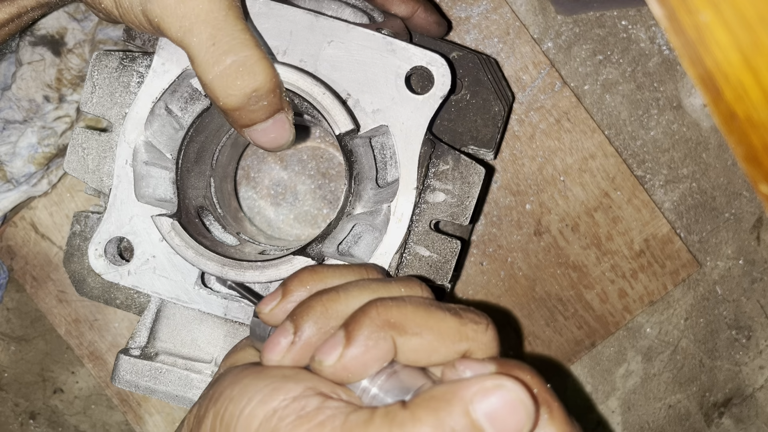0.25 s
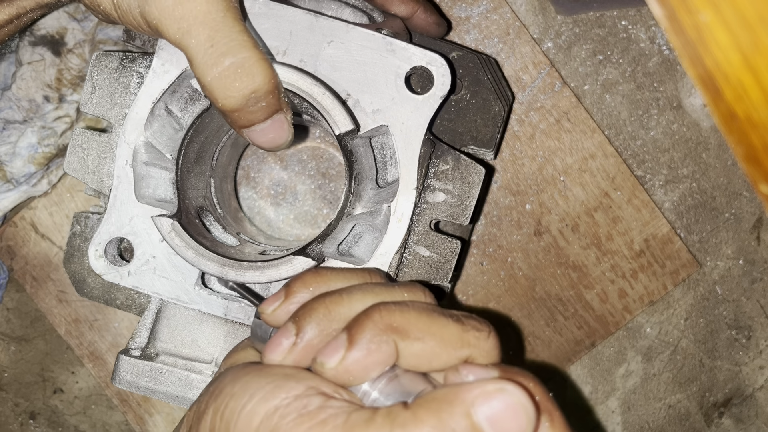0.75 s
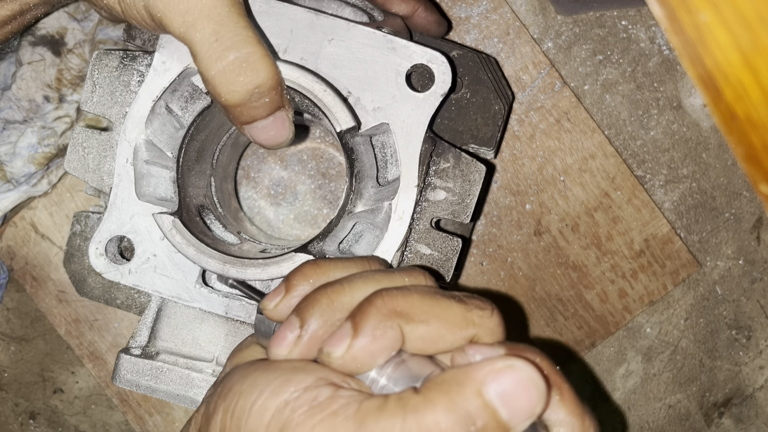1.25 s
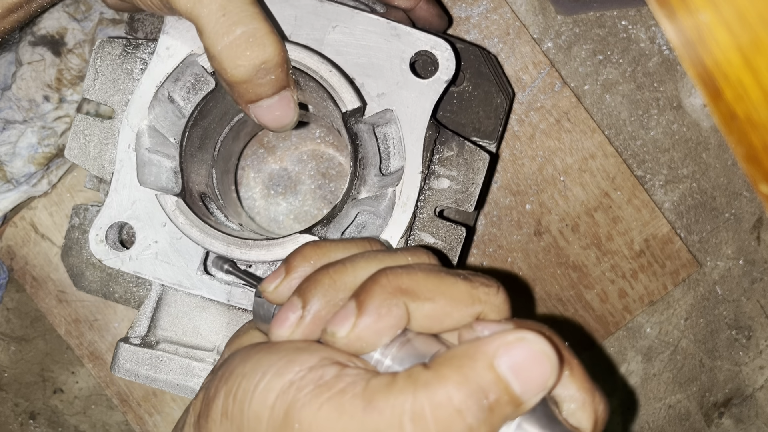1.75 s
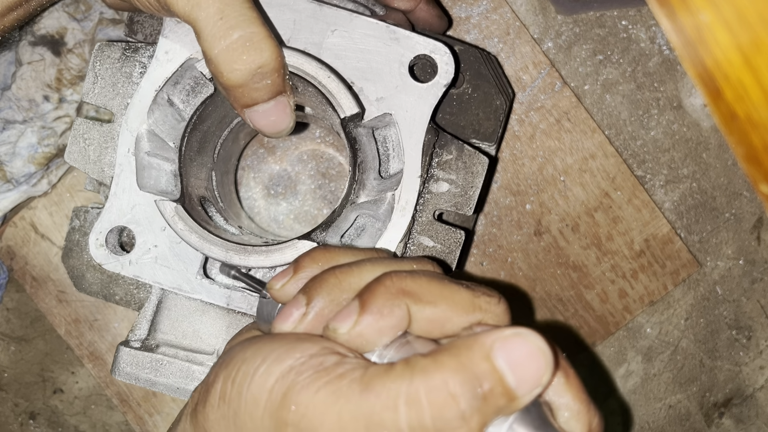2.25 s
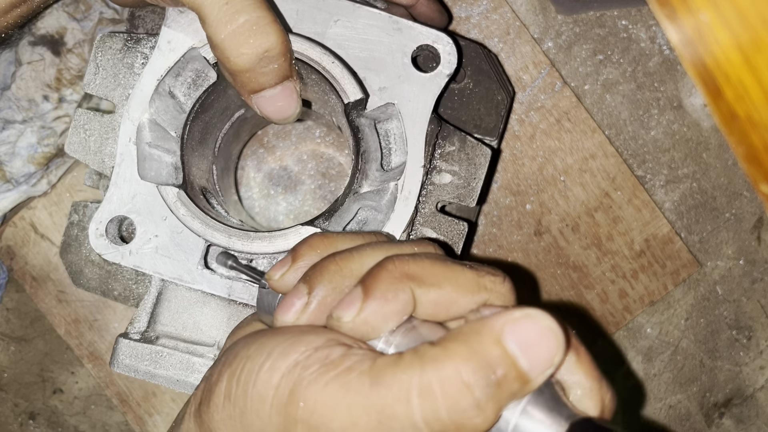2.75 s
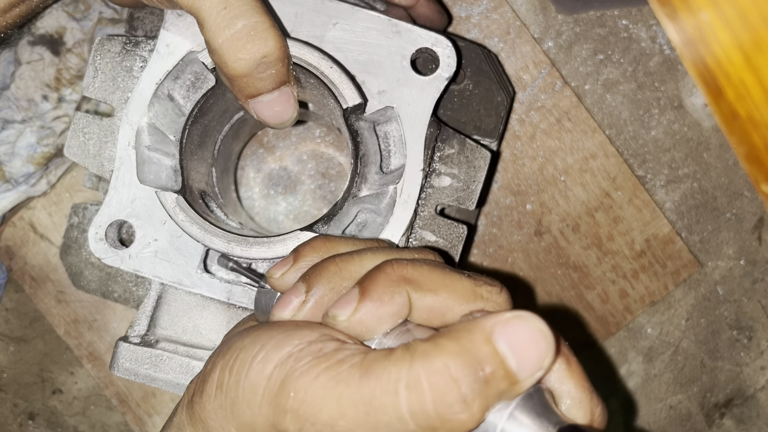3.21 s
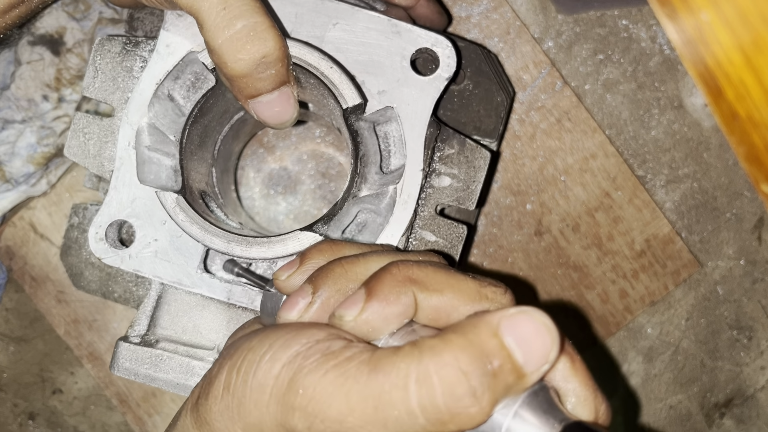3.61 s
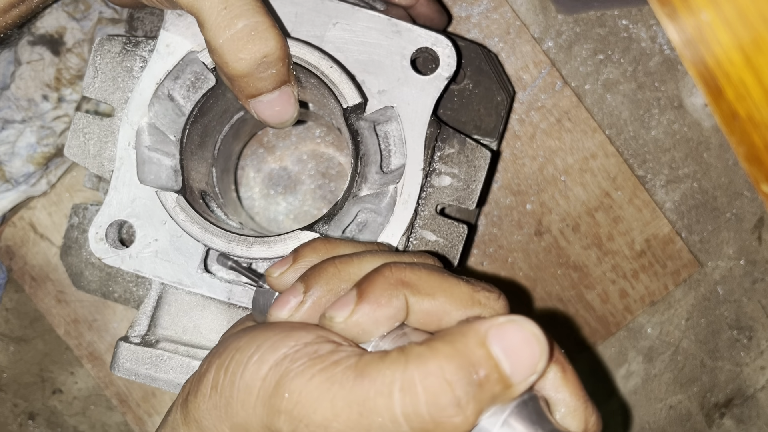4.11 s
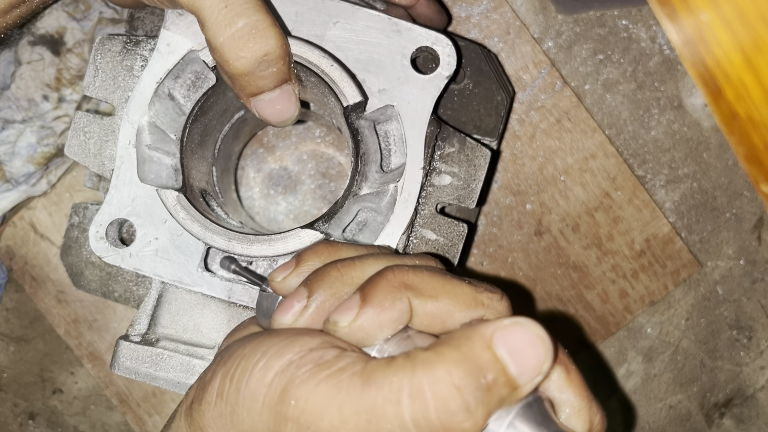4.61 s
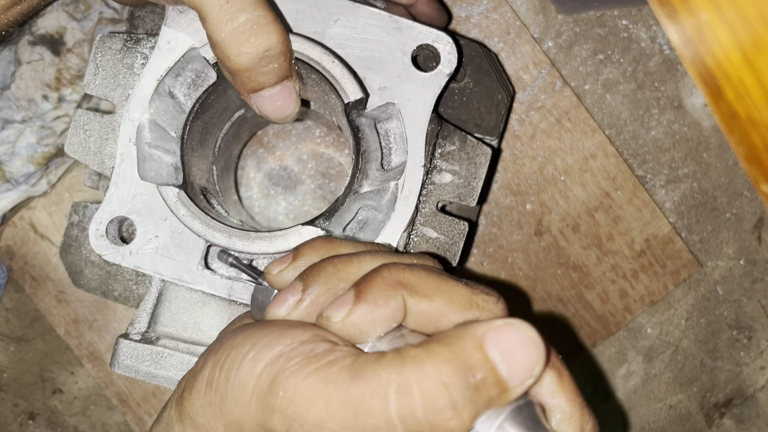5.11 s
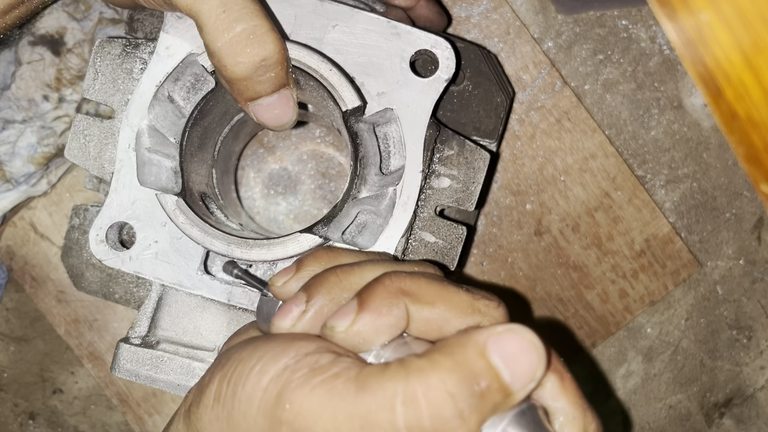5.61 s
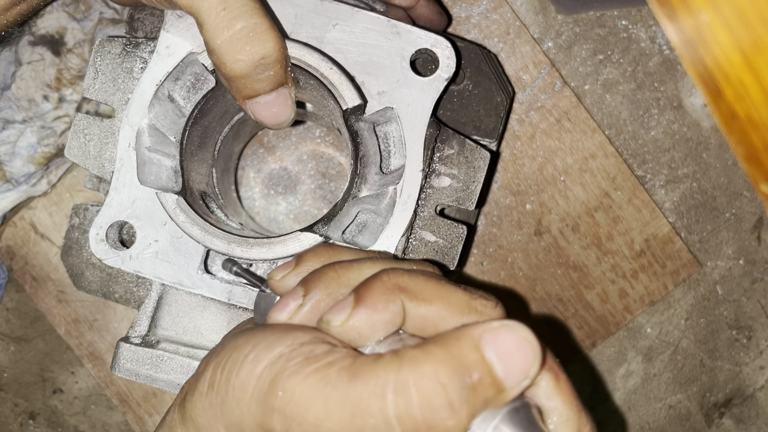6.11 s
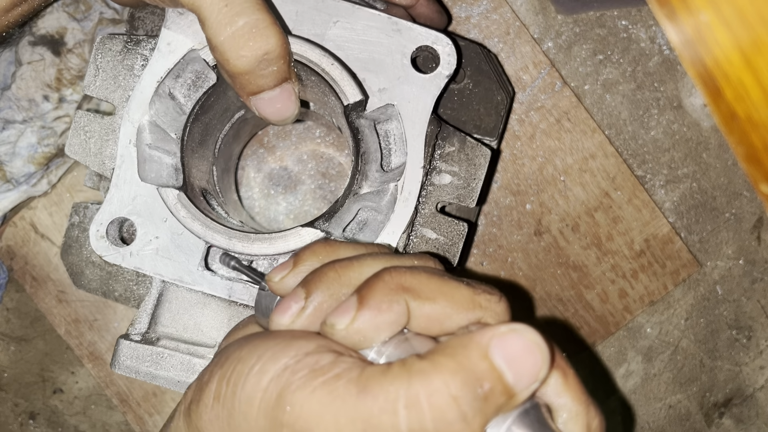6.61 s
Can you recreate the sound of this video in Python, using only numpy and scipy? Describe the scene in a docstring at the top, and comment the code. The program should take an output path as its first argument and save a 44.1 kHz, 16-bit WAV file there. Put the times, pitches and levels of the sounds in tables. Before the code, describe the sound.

A small handheld grinder carves a metal engine cylinder in short, rasping, screeching passes, whirring quietly in between.

```python
"""A die grinder's toothed burr carves a port of an aluminium engine cylinder, close up, in nine passes.
It bites at once: each flute strikes the wall and tears a chip, and the casting rings. The shaft slows,
two light touches follow, then it speeds up for longer cuts. In each the burr first skates and screeches,
then seats, fills out and sets the cylinder singing, chattering when leaned on. Between passes the drive
whirrs freely. Near 4.5 s the work bumps on the bench, and three more passes follow."""
import sys
import numpy as np
from scipy import signal
from scipy.fft import rfft, irfft, next_fast_len
from scipy.io import wavfile
from scipy.ndimage import uniform_filter1d

SR = 44100
rng = np.random.default_rng(int(sys.argv[2]) if len(sys.argv) > 2 else 0)


def put_to_file(sound):
    """Save the sound as 16-bit audio at rate SR, in the file named by the first command-line argument."""
    columns = np.atleast_2d(sound).T  # one column per channel
    safe = np.clip(columns, -1, 1)
    whole_steps = np.round(safe * 32767)
    wavfile.write(sys.argv[1], SR, whole_steps.astype(np.int16))


N = 302526
FFT_SIZE = 2 * next_fast_len(N // 2 + 8192)
TIME, FREQ = np.arange(N) / SR, np.fft.rfftfreq(FFT_SIZE, 1 / SR)

# the shaft's drifting speed: (time [s], turn rate [Hz])
SHAFT_SPEED = [(0.0, 89.3), (0.19, 90.47), (0.61, 77.25), (1.2, 56.8), (1.43, 77.4), (1.6, 85.1),
               (1.74, 98.87), (1.97, 110.6), (2.69, 123.7), (2.77, 112.5), (3.1, 110.1), (3.52, 94.05),
               (4.03, 91.45), (4.49, 82.65), (4.64, 81.24), (5.06, 119.1), (5.69, 128.4), (6.32, 99.1),
               (6.74, 97.3), (6.86, 93.7)]
# how hard the burr bites, one curve a pass: (time [s], level [dB])
BITE_CURVES = [
    [(0.0, -38), (0.242, -26), (0.386, -32.5), (0.608, -29), (0.622, -28), (0.686, -31), (0.722, -28),
     (0.79, -31.5), (0.808, -27), (1.0, -36), (1.06, -34.5), (1.1, -44)],
    [(1.242, -41.5), (1.27, -57), (1.275, -65)],
    [(1.33, -45.5), (1.38, -41), (1.44, -45.5), (1.454, -38.5), (1.462, -44), (1.492, -39.5),
     (1.554, -48.5), (1.57, -50)],
    [(1.845, -44), (1.849, -31), (2.145, -25), (2.213, -30), (2.227, -25), (2.277, -25.5), (2.301, -28),
     (2.383, -24.5), (2.391, -28.5), (2.419, -27), (2.473, -36), (2.49, -42.5)],
    [(2.877, -33), (3.059, -27.5), (3.137, -27.5), (3.143, -29), (3.473, -29), (3.481, -32), (3.533, -29.5),
     (3.563, -37), (3.601, -39), (3.609, -40.5), (3.64, -49.5)],
    [(3.77, -31), (3.788, -49), (3.794, -38.5), (3.962, -31.5), (4.128, -31), (4.218, -31.5), (4.236, -35),
     (4.296, -30.5), (4.466, -36), (4.488, -44), (4.526, -42), (4.54, -53)],
    [(4.793, -43), (4.937, -35), (4.963, -31.5), (5.097, -27), (5.117, -30), (5.151, -26.5), (5.235, -28.5),
     (5.345, -25.5), (5.443, -29.5), (5.457, -27), (5.531, -36.5), (5.57, -56)],
    [(5.711, -38), (5.717, -36.5), (5.793, -37), (5.849, -29), (5.875, -30.5), (5.891, -28.5),
     (5.949, -28.5), (5.993, -27), (6.025, -29.5), (6.313, -29.5), (6.353, -36), (6.4, -47)],
    [(6.62, -44), (6.628, -43), (6.718, -29), (6.75, -31.5), (6.86, -33)],
]
# attack and colour of each pass: (landing time [s], seating time [s], knock [dB], then trims for
# hiss [dB], screech [dB], chatter [dB], shudder [dB], bell [dB], flange [dB])
PASS_VOICING = [ (0.0068, 0.01, -6, -1.5, 0, -5, -7, 1, -0.5),
                (0.00036, 0.3, 11.5, -4, -2, -12, -5, 10, 10), (0.009, 0.3, 0, -2.5, 0, -1, -8, 6, 1.5),
                (0.00047, 0.3, 14, -1, 1.5, 1.5, -2, 3.5, -6),
                (0.0094, 0.34, 0, -0.5, 3.5, 2.5, -7.5, 3.5, -1.5),
                (0.021, 0.45, -6, 0, 1, 0, -12, 6.5, -1), (0.0004, 0.37, 6, -1, 2.5, -0.5, 0, 1, -6),
                (0.00037, 0.21, 1, -0.5, 0.5, 2, -2.5, 2.5, 1), (0.00046, 0.43, 13, 0, 1, -6, -4, 3, 0.5), ]
# the burr judders in the cut: (time [s], length [s], chatter boost [dB], shudder boost [dB])
JUDDER_SWELLS = [(0.24, 0.08, 0, 3), (0.826, 0.39, 4.5, 11), (2.246, 0.044, 2, 1), (2.36, 0.068, 3, -2.5),
                 (3.362, 0.042, 3, -1), (4.336, 0.23, 5, 6), (5.402, 0.12, 4, 3.5), (6.25, 0.07, 2.5, 8)]
# the cylinder's bell mode sings out: (time [s], length [s], boost [dB])
BELL_SWELLS = [(0.262, 0.035, 10), (0.84, 0.15, 5.5), (1.032, 0.14, 10.5), (2.328, 0.024, 8),
               (3.535, 0.078, 9.5), (4.287, 0.057, 6), (4.459, 0.036, 6.5), (5.105, 0.041, 14.5),
               (5.306, 0.14, 15.5), (6.33, 0.091, 12.5)]
# the casting's clear ring: (frequency [Hz], width [Hz], level [dB])
CASTING_MODES = [(2152, 18, 6.7), (2901, 18, -2.8), (3235, 18, 0.9), (3476, 144, 0.5), (3690, 34, 2.0),
                 (4121, 170, -1.6), (4484, 27, 10.5), (4548, 50, 2.7), (5703, 80, -1.3), (6187, 32, -2.8),
                 (6306, 18, 3.7), (6542, 22, 6.2), (7290, 58, 7.8), (7447, 63, 6.5), (7821, 21, 3.0),
                 (8029, 33, 4.6), (8850, 23, 0.4), (9270, 30, 2), (9931, 149, 1.6), (10456, 27, 2.2),
                 (11033, 170, -0.9), (13400, 250, -16), (14772, 25, -6.1), (15100, 110, -12),
                 (15595, 84, -4.8)]
# the wash of its dense, damped modes: (frequency [Hz], level [dB])
CASTING_WASH = [(600, -27.5), (1500, 2), (2000, 0.5), (2500, -2), (4300, -9), (5200, -46), (6000, -33),
                (6700, -9.5), (7400, -0.5), (8600, -13), (11400, -15), (12500, -20), (14500, -15),
                (15700, -58)]
# sharp modes of the thin port wall: (frequency [Hz], width [Hz], level [dB])
SCREECH_MODES = [(4965, 22, 0.0), (5135, 43, -8.5), (5345, 33, -6.3), (5450, 14, -9.4)]
# the wall's damped rasp beneath them: (frequency [Hz], width [Hz], level [dB])
RASP_MODES = [(4510, 73, -6), (5600, 300, -17)]
# a second sharp ring, likely the flange: (frequency [Hz], width [Hz], level [dB])
FLANGE_MODES = [(2147, 32, 0)]
# resonances that swell as the burr is leaned on: (frequency [Hz], width [Hz], level [dB])
CHATTER_MODES = [(1160, 140, -3), (1508, 93, 8.5), (1725, 50, 3), (1873, 49, 0.5)]
# the handpiece's shudder: (frequency [Hz], width [Hz], level [dB])
SHUDDER_MODES = [(854, 17, 6), (1060, 90, 0), (610, 560, -7)]
# thin rings of the lifted burr and the casting: (time [s], pitch [Hz], decay [s], level [dB])
LIFT_RINGS = [(2.47, 5520, 0.049, -41), (5.608, 2420, 0.31, -44)]
# soft bench bumps: (time [s], start pitch [Hz], end pitch [Hz], decay [s], level [dB])
BENCH_BUMPS = [(4.497, 110, 61, 0.052, -29), (4.548, 317, 55.7, 0.048, -24),
               (4.784, 185.9, 181.7, 0.075, -35.5)]
# colour of the free-running drive: (frequency [Hz], level [dB])
WHIRR_EQ = [(60, -20.5), (150, -6), (280, -7.5), (420, 0), (650, -9.5), (1000, -8), (1500, -15),
            (2000, -27.5), (3000, -37.5)]
# the whirr's own level over time: (time [s], level [dB])
WHIRR_LEVEL = [(0.0, -39), (2.03, -41.5), (2.25, -43.5), (4.81, -44.5), (4.93, -44.5), (6.86, -44.5)]
# colour of the drive's air hiss: (frequency [Hz], level [dB])
AIR_EQ = [(1000, 15), (2500, 9), (5000, 8), (7400, 6), (10000, -6), (12500, 6.5), (15500, -21.5)]
# faint tones of the drive: (pitch [multiple of shaft rate], level [dB])
SHAFT_TONES = [(2, -52), (12, -51.5), (20, -68)]
# colour of hands rumbling on the work: (frequency [Hz], level [dB])
RUMBLE_EQ = [(20, -44), (40, -14), (60, 5), (100, 0.5), (160, -11), (300, -25)]
# the rumble's own level over time: (time [s], level [dB])
RUMBLE_LEVEL = [(0.0, -54), (0.13, -51), (0.3, -45.5), (0.44, -41.5), (0.63, -48), (1.83, -42), (2.14, -47),
                (3.15, -54), (3.44, -48.5), (3.92, -53), (4.39, -49), (4.55, -52.5), (5.04, -37),
                (5.39, -47), (5.81, -42), (6.08, -54), (6.57, -55), (6.86, -49)]
# stereo spread in phase: (frequency [Hz], left lead [rad])
STEREO_PHASE = [(100, 0), (400, 1.4), (900, 1.6), (1150, 3.8), (1620, 3.9), (1720, 6.3), (2200, 6.3),
                (2700, 7.2), (4500, 7), (5500, 5.5), (7000, 4.5), (8100, 3.2), (8900, 3.05), (11200, 0.1),
                (13000, 0), (14500, -3.1)]
# stereo spread in level: (frequency [Hz], left minus right [dB])
STEREO_BALANCE = [(60, 2), (110, -2), (200, -2), (380, -2), (700, 5.5), (1290, 1), (2380, 4.5), (4400, 9.5),
                  (8120, 0.5), (15000, 0)]

FLUTES, BELL_HZ = 15, 2693
# trims on the bite: (skating [dB], seated [dB])
BODY_TRIM, SCREECH_TRIM, CHATTER_TRIM = (-2.5, 0), (3.74, -1.3), (-7, -3.3)
SHUDDER_TRIM, BELL_TRIM = (-13, -6.5), (-15, -6.5)
# chips hiss more at speed and in a deep cut; both slopes count from a typical cut
TYPICAL_SHAFT_HZ, TYPICAL_BITE_DB = 112.6, -25.5
HISS_DB_PER_HZ, HISS_DB_PER_DB = 0.0477, 0.34


def cutting(turns, speed):
    """Flute blows and tearing chips drive the casting, the burr and the handpiece."""
    body, bite, hiss, screech, chatter, bell, shudder, flange = contact_envelopes(speed)
    depth = engagement(turns, bite)
    blows = steady(flute_strikes(turns), .05) * depth
    chips = steady(tearing_chips(turns), .1) * depth
    force = through(blows + chips + flute_whine(turns) * depth, dispersion(.0003))
    return (ringing_metal(force, body, bite, hiss, screech, flange)
            + chatter_and_shudder(blows, turns, chatter, shudder)
            + squawk(turns, chatter, bite)
            + singing_cylinder(bell))


def flute_strikes(turns, wear_db=4, scatter_db=2, uneven=.3, jitter=.075):
    """One blow a flute: unequal, unevenly spaced flutes repeat every turn, and each chip differs."""
    flute = np.arange(int(turns[-1] * FLUTES))
    wear, spacing = (rng.permutation(np.linspace(-1, 1, FLUTES))[flute % FLUTES] for _ in range(2))
    late, chip = rng.standard_normal((N // 10, 2))[flute].T
    at = np.interp((flute + uneven * spacing + jitter * late) / FLUTES, turns, np.arange(N))
    size = undb(wear_db * wear + scatter_db * chip)
    i, part = at.astype(int), at % 1  # each blow is shared between two samples
    return (np.bincount(i, size * (1 - part), N + 1) + np.bincount(i + 1, size * part, N + 1))[:N]


def tearing_chips(turns):
    """Gritty noise that eases off after each flute bites."""
    return rng.standard_normal(N) * np.exp(-(turns * FLUTES % 1) / 3.6) * undb(walk(600))


def flute_whine(turns, level_db=-11, waver_rad=1.42, flutter_db=3):
    """A wavering whine an octave above the flutes' passing rate."""
    gain = undb(level_db + flutter_db * walk(30))
    return gain * np.sin(2 * np.pi * 2 * FLUTES * turns + waver_rad * walk(240))


def contact_envelopes(speed, lift_s=.014, seating_s=.071):
    """A gain a layer: the burr skates, thin and screeching, then seats, fills out, chatters and sings."""
    bell_boost = sum(db * swell(s, length) for s, length, db in BELL_SWELLS)
    judder = sum(np.outer(dbs, swell(s, length)) for s, length, *dbs in JUDDER_SWELLS)
    gains = np.zeros((8, N))
    for curve, (land_s, seat_s, _, *trims) in zip(BITE_CURVES, PASS_VOICING):
        hiss, screech, chatter, shudder, bell, flange = trims
        start, end = curve[0][0], curve[-1][0]
        on = (TIME >= start) & (TIME < end + 10 * lift_s)
        t, bite = TIME[on], automation(curve)[on]
        touch = np.minimum((t - start) / land_s, 1) * np.exp(-np.maximum(t - end, 0) / lift_s)
        seated = .5 + .5 * np.tanh((t - start - seat_s) / (2 * seating_s))
        crossfade = lambda trim: np.interp(seated, (0, 1), trim)
        speed_hiss = HISS_DB_PER_HZ * (speed[on] - TYPICAL_SHAFT_HZ)
        depth_hiss = HISS_DB_PER_DB * (bite - TYPICAL_BITE_DB)
        gains[:, on] += touch * undb([
            bite + crossfade(BODY_TRIM),
            bite,
            bite + hiss + speed_hiss + depth_hiss,
            bite + screech + crossfade(SCREECH_TRIM),
            bite + chatter + crossfade(CHATTER_TRIM) + judder[0, on],
            bite + bell + crossfade(BELL_TRIM) + bell_boost[on],
            bite + shudder + crossfade(SHUDDER_TRIM) + judder[1, on],
            bite + flange])
    return gains


def engagement(turns, bite, light_db=-33, skip_db=9, deep_db=-2.5, bounce_s=.029, knock_s=.0012):
    """The burr lands with a knock and runs out of true: a light or fresh touch grazes once a turn."""
    lightness = 1 / (1 + (bite / undb(light_db)) ** 2)
    knocks = 0
    for curve, (_, _, knock_db, *_) in zip(BITE_CURVES, PASS_VOICING):
        age = TIME - curve[0][0]
        lightness = np.maximum(lightness, (age > 0) * np.exp(-np.abs(age) / bounce_s))
        knocks += undb(knock_db) * (age > 0) * np.exp(-np.abs(age) / knock_s)
    runout_db = (deep_db + skip_db * lightness) * np.cos(2 * np.pi * turns)
    return np.maximum(steady(undb(runout_db + walk(70)), .045), knocks)


def dispersion(seconds):
    """Bending waves reach the air by many paths: a flat response that smears each blow."""
    smear = rfft(rng.standard_normal(2048) * np.exp(-TIME[:2048] / seconds), FFT_SIZE)
    return smear / np.abs(smear)


def ringing_metal(force, body, bite, hiss, screech, flange, flare_db=2.8):
    """The cut rings the casting in three bands, the thin screeching port wall and the flange."""
    power = undb(-.5) ** 2 * resonances(CASTING_MODES) + undb(across(CASTING_WASH)) ** 2
    low_cut = FREQ ** 2 / (FREQ ** 2 + 700 ** 2)
    casting = causal(np.sqrt(power * low_cut))
    low = 1 / (1 + (FREQ / 3000) ** 12)
    treble = 1 / (1 + (6000 / (FREQ + 1)) ** 12)
    wall = causal(np.sqrt(resonances(SCREECH_MODES + RASP_MODES)) / (1 + ((FREQ - 5200) / 650) ** 4))
    layers = ((casting * low, body * undb(-.64)),
              (casting * (1 - low - treble), bite * undb(.6)),
              (casting * treble, hiss * undb(9.5)),
              (wall, screech * undb(-.5 + flare_db * walk(21.87))),
              (causal(resonances(FLANGE_MODES)), flange * undb(-9)))
    return sum(through(force * gain, tone) / through(force, tone).std() for tone, gain in layers)


def chatter_and_shudder(blows, turns, chatter, shudder, whirl_db=4, stutter_db=1.5):
    """Leaned on, the burr whirls and stutters; its blows ring the chatter modes and the handpiece."""
    whirl = blows * undb(whirl_db * np.sin(2 * np.pi * turns) + stutter_db * walk(90))
    centre = stereo_response().mean(axis=0)
    out = 0
    for modes, gain, hz in ((CHATTER_MODES, chatter * undb(-3.5), 1500),
                            (SHUDDER_MODES, shudder * undb(-1), 800)):
        skirt = 1 / (1 + (np.log((FREQ + 1) / hz) / .45) ** 4)
        ring = through(whirl, causal(np.sqrt(resonances(modes)) * skirt))
        out += gain * ring / running_rms(through(ring, centre), .17)  # levelled at the stereo centre
    return out


def squawk(turns, chatter, bite, boost_db=8.5, sway_rad=.29, waver_rad=.63, flutter_db=3):
    """Chatter that outgrows the bite locks to the flutes: a rough tone, swayed once a turn."""
    locked = chatter ** 4 / (chatter ** 4 + bite ** 4 + 1e-24)
    phase = 2 * np.pi * FLUTES * turns + sway_rad * np.sin(2 * np.pi * turns)
    tone = np.sin(phase + waver_rad * walk(190))
    return chatter * locked * tone * undb(boost_db + flutter_db * walk(110))


def singing_cylinder(bell, boost_db=2, flutter_db=2):
    """Friction keeps the cylinder's bell mode singing, with a slight waver."""
    cycles = np.cumsum(BELL_HZ * (1 + walk(70) / 400)) / SR
    return bell * undb(boost_db + flutter_db * walk(60)) * np.sin(2 * np.pi * cycles)


def lift_rings():
    """Single modes left ringing as the burr lifts."""
    out = 0
    for s, hz, decay, db in LIFT_RINGS:
        t = np.maximum(TIME - s, 0)
        out += undb(db) * np.exp(-t / decay) * np.sin(2 * np.pi * hz * t)
    return out


def bench_bumps(glide_s=.0097):
    """Dull knocks whose pitch sinks as the weight settles."""
    out = 0
    for s, first_hz, last_hz, decay, db in BENCH_BUMPS:
        t = np.maximum(TIME - s, 0)
        cycles = last_hz * t + (first_hz - last_hz) * glide_s * (1 - np.exp(-t / glide_s))
        out -= undb(db) * np.exp(-t / decay) * np.sin(2 * np.pi * cycles)
    return out


def drive_and_hands(turns, speed, air_db=-49, rattle_db=.5):
    """Bearings rattle once a turn, air hisses with speed, tones follow the shaft, hands rumble."""
    rattle = undb(rattle_db * np.cos(2 * np.pi * turns) + walk(25))
    whirr = undb(automation(WHIRR_LEVEL) + 3) * rattle
    air = undb(air_db) * (speed / speed.mean()) ** 1.9
    rumble = undb(automation(RUMBLE_LEVEL) + .5 + 2.68 * walk(14))
    bed = 0
    for eq, gain, width in ((WHIRR_EQ, whirr, .94), (AIR_EQ, air, .94), (RUMBLE_EQ, rumble, .3)):
        noise = through(rng.standard_normal((3, N)), undb(across(eq)))
        noise *= gain / noise.std()
        bed += stereo(noise[0]) + width * noise[1:]
    tones = sum(undb(db + 2.5 * walk(8)) * np.sin(2 * np.pi * k * turns) for k, db in SHAFT_TONES)
    return bed + stereo(tones)


def workshop(x, t60=.16, room_db=-12, dull_hz=6000):
    """Short, dull reflections from bench and walls, different left and right."""
    tail = rng.standard_normal((2, SR // 2)) * undb(-60 * TIME[:SR // 2] / t60)
    tail /= np.sqrt(np.sum(tail ** 2, axis=1, keepdims=True))
    return undb(room_db) * through(x, rfft(tail, FFT_SIZE) / (1 + (FREQ / dull_hz) ** 6))


def stereo(x):
    """Spread a mono sound across left and right."""
    return through(x, stereo_response())


def stereo_response():
    """The stereo spread of the sound: left-right phase and level by frequency."""
    half = undb(across(STEREO_BALANCE) / 2) * np.exp(.5j * across(STEREO_PHASE))
    return np.array([half, 1 / half])


def undb(db):
    """Decibels to gain."""
    return 10 ** (np.asarray(db) / 20)


def automation(points):
    """(time, value) points joined, one value a sample."""
    return np.interp(TIME, *np.transpose(points))


def swell(s, length):
    """A smooth rise and fall around a moment, 1 at its top."""
    return np.exp(-(2 * (TIME - s) / length) ** 2)


def walk(rate):
    """Random levels held 1 / rate s and slewed; spread near 1."""
    hold = max(int(SR / rate), 1)
    return 1.2 * uniform_filter1d(np.repeat(rng.standard_normal(N)[:N // hold + 1], hold), hold)[:N]


def across(points):
    """(frequency, value) points joined on a log-frequency axis."""
    hz, value = np.transpose(points)
    return np.interp(np.log(FREQ + 1), np.log(hz), value)


def resonances(modes):
    """Power response of a bank of modes."""
    return sum(undb(db) ** 2 / (1 + ((FREQ ** 2 - hz ** 2) / (width * (FREQ + 1))) ** 2)
               for hz, width, db in modes)


def causal(gain):
    """The minimum-phase response with this gain: it rings after a blow, never before."""
    cepstrum = irfft(np.log(gain + 1e-6))
    cepstrum[1:FFT_SIZE // 2] *= 2
    cepstrum[FFT_SIZE // 2 + 1:] = 0
    return np.exp(rfft(cepstrum))


def through(x, response):
    """Filter by a frequency response."""
    return irfft(rfft(x, FFT_SIZE) * response)[..., :N]


def running_rms(x, seconds):
    """Level over a sliding window."""
    return np.sqrt(np.abs(uniform_filter1d(x ** 2, int(seconds * SR))) + 1e-12)


def steady(x, seconds):
    """Scale to a running rms of 1."""
    return x / running_rms(x, seconds)


def scene():
    """One shaft drives both the cut and the whirr; room and bench bumps join the mix."""
    speed = automation(SHAFT_SPEED) * (1 + .01 * walk(35))
    turns = np.cumsum(speed) / SR
    cut = cutting(turns, speed)
    return stereo(cut + lift_rings()) + workshop(cut) + drive_and_hands(turns, speed) + bench_bumps()


def record(dry, top_hz=15550):
    """A steep low-pass shaves off the top."""
    return signal.sosfilt(signal.ellip(10, .2, 80, top_hz, fs=SR, output="sos"), dry)


dry = scene()
out = record(dry)
put_to_file(out)
```